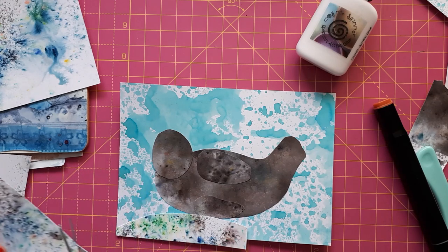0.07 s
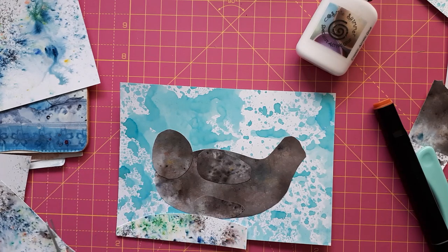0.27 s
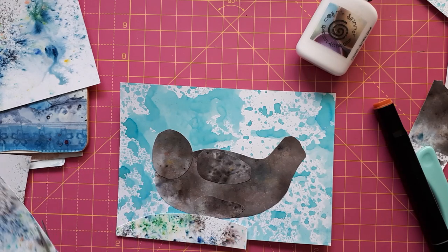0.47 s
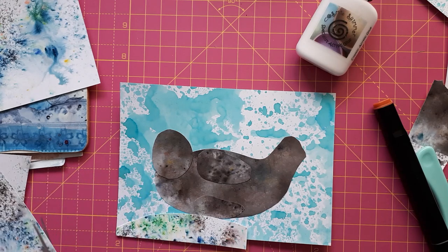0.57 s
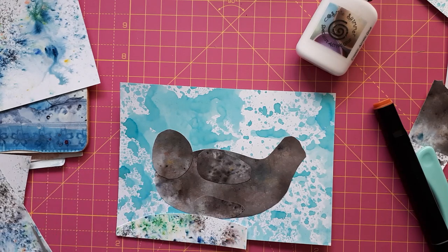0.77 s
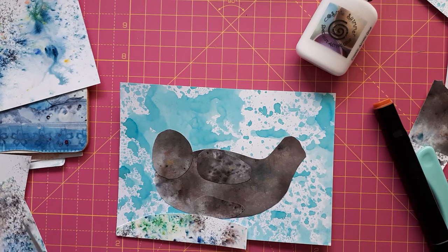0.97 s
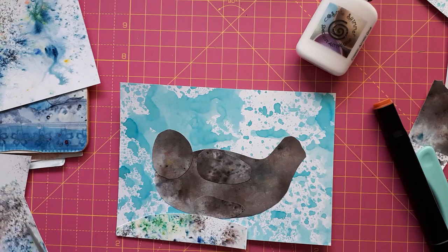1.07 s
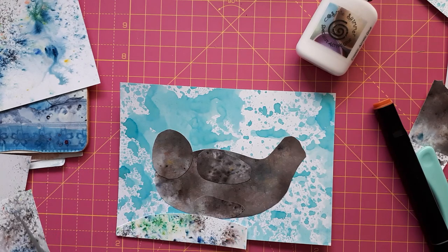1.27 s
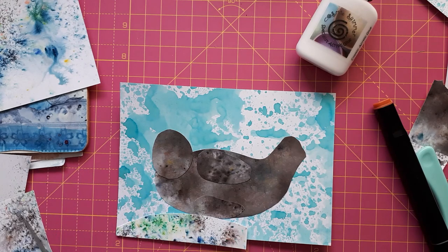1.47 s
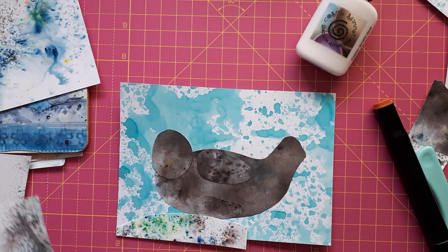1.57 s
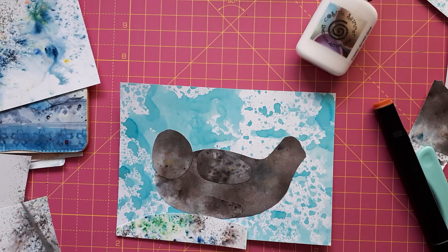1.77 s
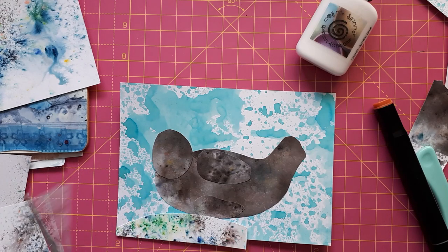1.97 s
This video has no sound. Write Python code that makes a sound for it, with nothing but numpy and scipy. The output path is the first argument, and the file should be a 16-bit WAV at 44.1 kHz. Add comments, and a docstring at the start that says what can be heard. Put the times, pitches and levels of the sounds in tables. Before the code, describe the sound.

Close-up scissors snipping through thick paper at a steady pace, blades finally clicking shut.

```python
"""Scissors through card, close up

In a quiet small room, scissors snip card close to a phone, a little to the right of its two ports.
Each closing stroke tears the card in stick-slip bursts of clicks that ring card and blades, over
friction noise; on each opening the blades slide softly over each other. The last cut ends with the
blades snapping shut over a soft thud. Behind lie a fading earlier ring, a short tail and a low hush."""
import sys
import numpy as np
from scipy import signal
from scipy.fft import rfft, irfft, next_fast_len
from scipy.io import wavfile
from scipy.ndimage import uniform_filter1d

SR = 44100
rng = np.random.default_rng(int(sys.argv[2]) if len(sys.argv) > 2 else 0)


def decibels_to_gain(level_db):
    """Convert a level in decibels to a linear amplitude gain (20 dB per decade)."""
    exponent = np.asarray(level_db, float) / 20
    return 10 ** exponent


def to_wav(sig):
    """Store sig (one row per channel, or 1-D mono) as 16-bit WAV at the path in sys.argv[1].

    Samples outside -1..1 are clipped; the rate is SR.
    """
    pcm = np.clip(np.atleast_2d(sig), -1, 1) * 32767
    pcm = np.round(pcm).astype(np.int16)
    wavfile.write(sys.argv[1], SR, pcm.T)  # frames by channels


N = 89390

# Blades clicking together: (start [s], level [dB], length [s], body ring re level [dB])
SNAP_EVENTS = [(1.962, -41, 0.007, -33), (1.997, -19.5, 0.0071, -9), (2, -34, 0.022, -3.5)]
CARD_T60_S = 0.017


def unit(x):
    """Scale to rms 1."""
    return x / np.sqrt(np.mean(x ** 2))


def crest(x):
    """Scale so that the loudest 2 ms have rms 1."""
    return x / np.sqrt(np.max(uniform_filter1d(x ** 2, size=88)))


def add(out, x, start_s):
    """Mix x into out at start_s seconds."""
    i = int(start_s * SR)
    out[i:i + len(x)] += x[:N - i]


def waver(size):
    """Slow chance with rms 1, smooth over size samples."""
    once = uniform_filter1d(rng.standard_normal(N), size=size)
    return unit(uniform_filter1d(once, size=size))


def colour(x, points, lag=((1, 0), (2, 0))):
    """Filter by (Hz, dB) points, optionally delaying phase by (Hz, radians) points."""
    n = next_fast_len(len(x) + 512)
    log_hz = np.log(np.arange(n // 2 + 1) * SR / n + 1e-3)

    def read(curve):
        hz, value = np.array(curve, float).T
        return np.interp(log_hz, np.log(hz), value)

    response = decibels_to_gain(read(points)) * np.exp(-1j * read(lag))
    return irfft(rfft(x, n) * response, n)[:len(x)]


def rings(modes, length_s=0.04):
    """Sum of decaying sines, one for each mode (Hz, dB, t60 s)."""
    t = np.arange(int(length_s * SR)) / SR
    total = 0
    for hz, db, t60 in modes:
        decay = np.exp(-np.log(1000) * t / max(t60, 0.002))
        total = total + decibels_to_gain(db) * np.sin(2 * np.pi * hz * t) * decay
    return total


def burst(length_s):
    """Sparse uneven clicks, and hiss, that swell fast, hold and stop, as fibres part."""
    clicks_per_s, scatter_db = 2800, 6
    chance = rng.random((3, 2048))
    u = np.arange(1, 2049) / SR / max(length_s, 0.0005)  # time in burst lengths
    shape = np.minimum(u / 0.33, 1) * np.exp(-u ** 3)
    happens = chance[0] < clicks_per_s / SR
    clicks = happens * np.sign(chance[1] - 0.5) * decibels_to_gain(scatter_db * (2 * chance[2] - 0.5))
    clicks[8] = 3  # one click is certain
    return clicks * shape, (chance[1] - 0.5) * shape


def body(hz_card):
    """Ring of card and scissors, detuned and reweighted at random by each grip of the card."""
    # Modes of card and scissors: (frequency [Hz], level [dB])
    modes = [(570, -26), (970, -34), (1300, -8.5), (1580, -29), (1850, 4.5), (2250, 2.5), (2950, 7.5),
             (3800, -0.5)]
    scatter_db, away_db_per_oct, t60_cycles = 4, 5, 16
    scatter = rng.standard_normal((2, len(modes)))
    hz, db = np.array(modes).T
    # modes far from the card's pitch ring more quietly
    db = db + scatter_db * scatter[0] - away_db_per_oct * np.abs(np.log2(hz / hz_card))
    return rings(zip(hz * (1 + 0.044 * scatter[1]), db, t60_cycles / hz))


def slips():
    """Every slip of the tearing card shakes the body modes anew and the loose card at its own pitch."""
    # Slips: (start [s], level [dB], treble re level [dB], card ring [Hz], length [s])
    slip_events = [(0.118, -70.5, 6.5, 935, 0.021), (0.143, -63.5, 6.5, 2200, 0.0098),
                   (0.174, -58, -2, 950, 0.0085), (0.225, -48, 0, 870, 0.013),
                   (.263, -39.5, -5.5, 820, 0.013), (0.289, -39.5, -6, 1550, 0.014),
                   (0.308, -36, -8, 925, 0.0031), (0.313, -39, -11, 870, 0.0036),
                   (0.3216, -36.5, -10, 1200, 0.0038), (0.3401, -29, -11.5, 920, 0.0037),
                   (0.3447, -25.5, -9, 1560, 0.0066), (0.3644, -30, -8.5, 993, 0.0061),
                   (0.645, -44, -2, 1040, 0.028), (0.666, -38, -2.5, 1310, 0.014),
                   (0.6764, -31, -3.5, 2220, 0.008), (0.687, -30, -10, 570, 0.012),
                   (0.712, -23.5, -10.5, 1585, 0.011), (0.7328, -29, -24, 594, 0.0035),
                   (1.0111, -42, -17, 1200, 0.0025), (1.0146, -32, -6.5, 1117, 0.011),
                   (1.026, -42, -3, 1150, 0.0079), (1.04, -31, -9, 2550, 0.005),
                   (1.0527, -32.5, -2.5, 910, 0.0082), (1.065, -42.5, -29, 1730, 0.004),
                   (1.0888, -25.5, -5.5, 2345, 0.0038), (1.093, -38, -15, 840, 0.0059),
                   (1.118, -51.5, -2, 835, 0.012), (1.3694, -40.5, -28, 1950, 0.006),
                   (1.3788, -34, -11, 1970, 0.00082), (1.384, -37.5, -0.5, 2030, 0.0047),
                   (1.3877, -25.5, -39, 2010, 0.0053), (1.398, -29.5, -8, 1290, 0.0079),
                   (1.415, -30, -7, 1190, 0.0062), (1.44, -32.5, -1.5, 1286, 0.003),
                   (1.803, -54.5, 3.5, 1040, 0.0029), (1.812, -42.5, -3.5, 1460, 0.0089),
                   (1.829, -33, -8, 1000, 0.0074), (1.842, -35, -3.5, 1570, 0.0081),
                   (1.865, -33, -2.5, 980, 0.0082), (1.8925, -35, 1, 1014, 0.0034)]
    # Bright part of a slip: (frequency [Hz], gain [dB])
    tear = [(2000, -24), (4000, 12), (6200, 2.5), (7700, 6), (9500, -1.5), (12000, 2.5), (15800, -7)]
    out = np.zeros(N)
    for start, db, treble_db, hz, length_s in slip_events:
        clicks, hiss = burst(length_s)
        ring = body(hz) + rings([(hz, 3, CARD_T60_S)])
        low = crest(signal.fftconvolve(clicks, ring)[:2048])
        treble = crest(colour(clicks + 0.74 * hiss, tear))
        add(out, decibels_to_gain(db) * (low + decibels_to_gain(treble_db) * treble), start)
    return out


def stroke(start, length, rise, fall):
    """Hand stroke (all in s): smooth rise, hold, exponential fall of 26 dB per fall time."""
    t = np.arange(N) / SR - start
    swell = np.sin(np.pi / 2 * np.clip(t / rise, 0, 1)) ** 2
    return swell * np.exp(-3 * np.clip((t - length) / fall, 0, 30))


def friction(spectrum, grain_db, flicker_db):
    """Dense grains of rubbing steel, uneven and flickering in level: raw, and filtered to rms 1."""
    unevenness = np.minimum(rng.exponential(size=N), 5)
    grains = rng.standard_normal(N) * decibels_to_gain(grain_db * unevenness)
    grains = grains * decibels_to_gain(flicker_db * waver(size=200))
    return grains, unit(colour(grains, spectrum))


def card(grains, hz):
    """The card's own ring and its overtone under friction, coming and going."""
    ring = rings([(hz, 0, CARD_T60_S), (1.83 * hz, -6, CARD_T60_S)])
    swing = decibels_to_gain(2.5 * waver(size=500))
    return swing * unit(signal.fftconvolve(grains, ring)[:N])


def shearing():
    """Blades shearing on between slips: friction noise that also rings the card."""
    # Closing strokes: (start [s], length [s], level [dB], card ring [Hz])
    cuts = [(0.213, 0.14, -53.5, 876), (0.632, 0.11, -47.5, 1640), (1, 0.086, -44.5, 985),
            (1.357, 0.083, -46, 1274), (1.787, 0.13, -50.5, 1003)]
    # Shearing noise: (frequency [Hz], gain [dB])
    spectrum = [(500, -64), (900, -15.5), (2400, 10.5), (5000, -1.5), (8000, -8.5), (16000, -8.5)]
    grains, shear = friction(spectrum, grain_db=3, flicker_db=3)
    out = np.zeros(N)
    for start, length, db, hz in cuts:
        rub = shear + decibels_to_gain(-4.5) * card(grains, hz)
        out += decibels_to_gain(db) * stroke(start, length, rise=0.051, fall=0.046) * rub
    return out


def sliding():
    """Blades sliding open: softer friction, swelling towards each stroke's fastest moment."""
    # Opening strokes: (start [s], length [s], level [dB], card ring [Hz], card ring re slide [dB],
    # fastest moment [share of length 0-1])
    openings = [(0.447, 0.12, -49.5, 2050, -8.5, 0.81), (0.829, 0.099, -47.5, 2140, -25, 0.62),
                (1.178, 0.11, -46, 2214, -2, 0.74), (1.543, 0.15, -48.5, 1145, -6, 0.46)]
    # Sliding noise: (frequency [Hz], gain [dB])
    spectrum = [(750, -17), (1050, -2.5), (2000, 3), (4000, 2), (5500, -4.5), (7800, -6), (9300, -14.5),
                (12000, -4.5), (16000, -13)]
    mid_swell_db = 12  # lost per stroke length away from the fastest moment
    t = np.arange(N) / SR
    grains, slide = friction(spectrum, grain_db=2.4, flicker_db=1.5)
    out = np.zeros(N)
    for start, length, db, hz, ring_db, fastest in openings:
        swell_db = -mid_swell_db * np.abs(np.clip((t - start) / length, 0, 1) - fastest)
        rub = slide + decibels_to_gain(ring_db) * card(grains, hz)
        out += decibels_to_gain(db + swell_db) * stroke(start, length, rise=0.027, fall=0.049) * rub
    return out


def snaps():
    """Steel on steel: a bright rattle of clicks over the body ring."""
    # Bright rattle: (frequency [Hz], gain [dB])
    rattle_spectrum = [(700, -15), (2200, -3), (4000, 0.5), (8000, -10), (14000, -7), (16500, -18)]
    out = np.zeros(N)
    for start, db, length_s, ring_db in SNAP_EVENTS:
        clicks, hiss = burst(length_s)
        low = crest(signal.fftconvolve(clicks, body(2200))[:2048])
        rattle = crest(colour(clicks + 3.1 * hiss, rattle_spectrum))
        add(out, decibels_to_gain(db) * (rattle + decibels_to_gain(ring_db) * low), start)
    return out


def table_thump():
    """A soft low thud of the table: one decaying sine."""
    # Thud: (frequency [Hz], level [dB], t60 [s])
    thud = (186, -57, 0.096)
    return rings([thud])


def earlier_ring():
    """Decaying sines left from an earlier knock, fading unevenly."""
    # Ringing modes: (frequency [Hz], level [dB], t60 [s])
    modes = [(590, -63.5, 0.19), (1890, -64, 0.27), (1956, -59.5, 0.17)]
    return rings(modes, N / SR) * decibels_to_gain(4.3 * waver(size=90))


def far_port(x):
    """Way to the far port: the bass keeps its phase; the treble's lag wavers slowly at random."""
    scatter_hz, scatter_rad = 3000, 1.1  # above this, hand and table scatter the sound

    def split(kind):
        sos = signal.butter(2, scatter_hz, kind, fs=SR, output="sos")
        return signal.sosfiltfilt(sos, x)

    turned = signal.hilbert(split("high")) * np.exp(1j * scatter_rad * waver(size=2000))
    return split("low") + turned.real


def ports(near):
    """Two ports beside the scissors: the left, farther one differs in level and trails in phase."""
    # Balance: (frequency [Hz], left minus right [dB])
    balance = [(1800, -7), (3000, -1), (4000, -7), (5300, -3), (7700, -8), (9500, -1.5), (14000, -6)]
    # Lag of the left port: (frequency [Hz], phase [radians])
    left_lag = [(800, .55), (2900, 1.6), (4200, 3.4), (9000, 7.3), (16000, 8.2)]
    left = colour(far_port(near), [(hz, db / 2) for hz, db in balance], left_lag)
    right = colour(near, [(hz, -db / 2) for hz, db in balance])
    return np.array([left, right])


def room(x):
    """A short diffuse tail: noise decaying octave by octave, different in each channel."""
    # Decay of the room: (frequency [Hz], t60 [s])
    decay = [(700, 0.18), (12000, 0.14)]
    level_db, delay_s = -12, 0.0066
    t = np.arange(int(0.4 * SR)) / SR
    decay_hz, decay_s = np.array(decay).T
    tail = 0
    for hz in 150 * 2.0 ** np.arange(7):
        sos = signal.butter(2, [hz, min(2 * hz, 20000)], "band", fs=SR, output="sos")
        band = signal.sosfilt(sos, rng.standard_normal((2, len(t))))
        t60 = np.interp(np.log(hz), np.log(decay_hz), decay_s)
        tail = tail + band * np.exp(-np.log(1000) * t / t60)
    tail = tail * (t > delay_s) / np.sqrt(np.sum(tail ** 2) / 2)
    return decibels_to_gain(level_db) * signal.fftconvolve(x[None], tail, axes=1)[:, :N]


def room_tone():
    """Low steady hush: filtered noise, partly shared by the channels."""
    # Hush: (frequency [Hz], gain [dB])
    spectrum = [(25, -22.5), (120, -1.5), (250, -12), (2000, -20.5), (4000, -27.5), (16000, -30)]
    level_db, likeness = -69.5, 0.35  # likeness: correlation of the channels
    mid = np.sqrt((1 + likeness) / 2) * unit(colour(rng.standard_normal(N), spectrum))
    side = np.sqrt((1 - likeness) / 2) * unit(colour(rng.standard_normal(N), spectrum))
    return decibels_to_gain(level_db) * np.array([mid + side, mid - side])


def scene():
    """Scissors nearer the right port, thud and earlier ring, their room tail, the hush."""
    # card and blades are too small to radiate bass
    small = signal.butter(5, 690, "high", fs=SR, output="sos")
    near = signal.sosfilt(small, slips() + shearing() + sliding() + snaps())
    add(near, table_thump(), SNAP_EVENTS[1][0])
    add(near, earlier_ring(), 0)
    return ports(near) + room(near) + room_tone()


def low_pass(x):
    """Removes everything above the highest recorded frequency."""
    return signal.sosfilt(signal.butter(12, 17110, fs=SR, output="sos"), x)


def record(dry):
    """The phone keeps the finished stereo mix."""
    return low_pass(dry)


dry = scene()
out = record(dry)
to_wav(out)
```